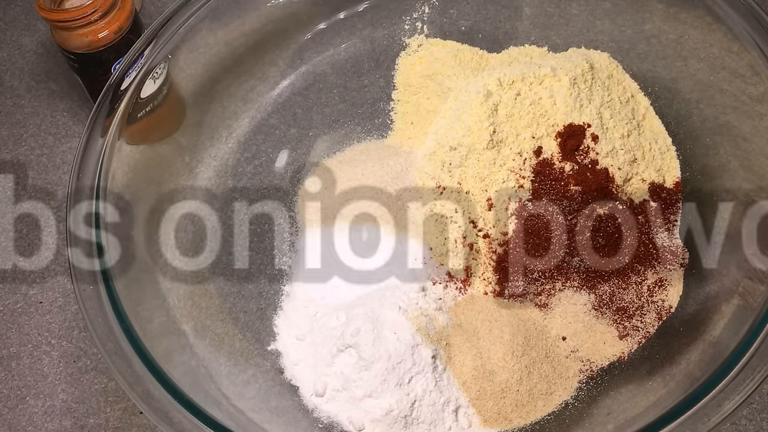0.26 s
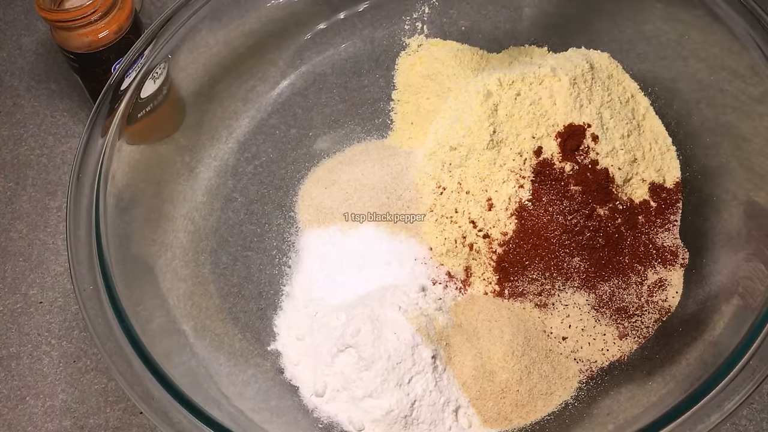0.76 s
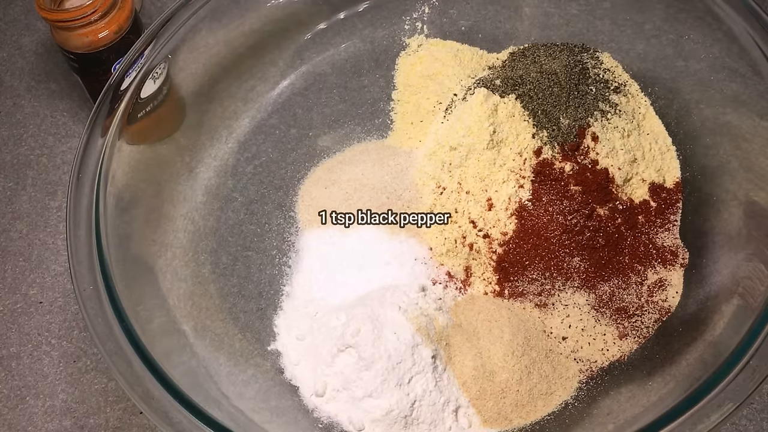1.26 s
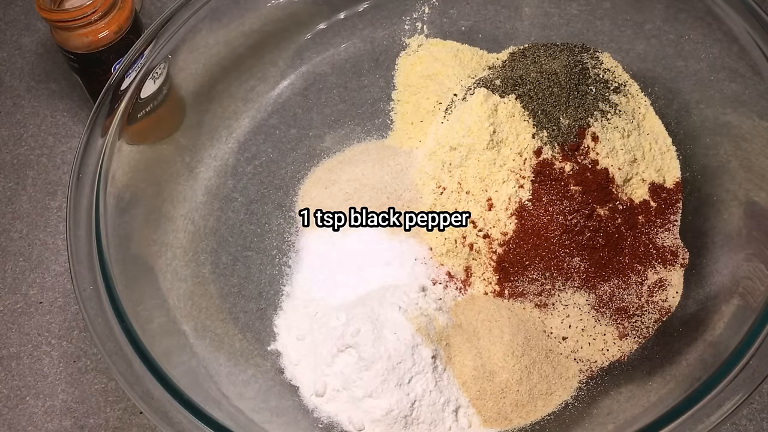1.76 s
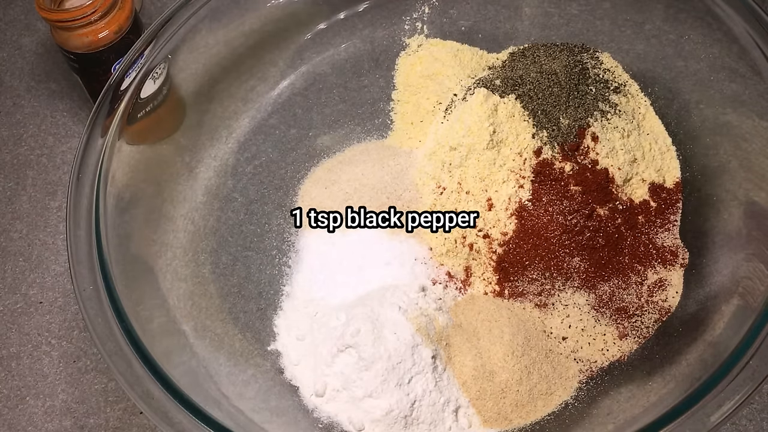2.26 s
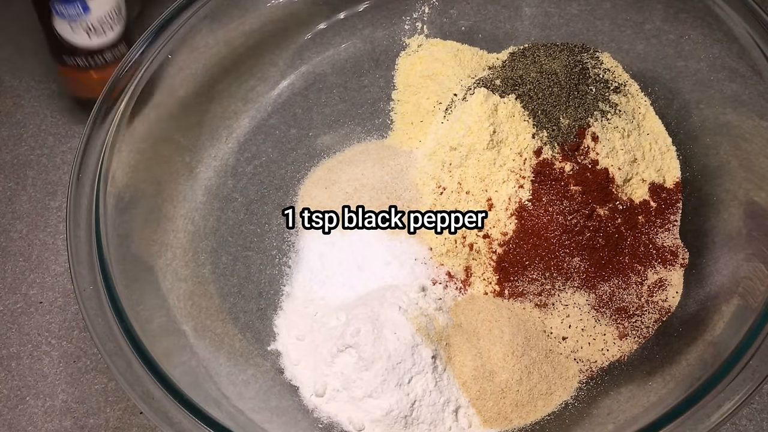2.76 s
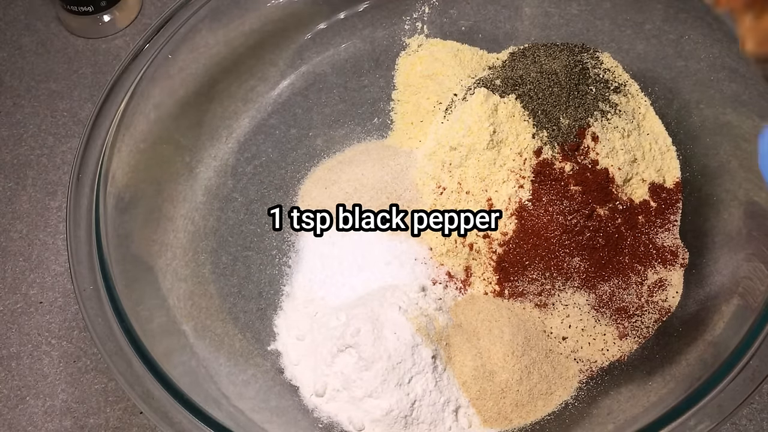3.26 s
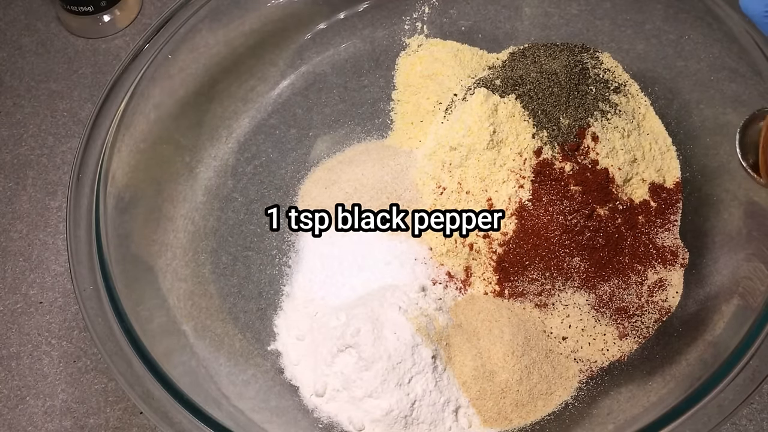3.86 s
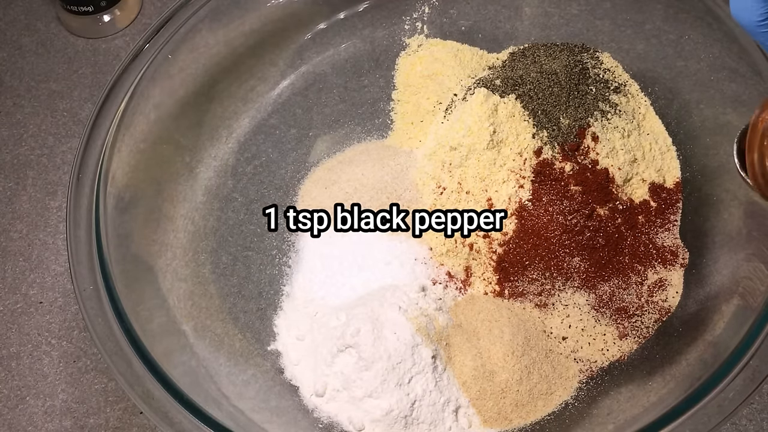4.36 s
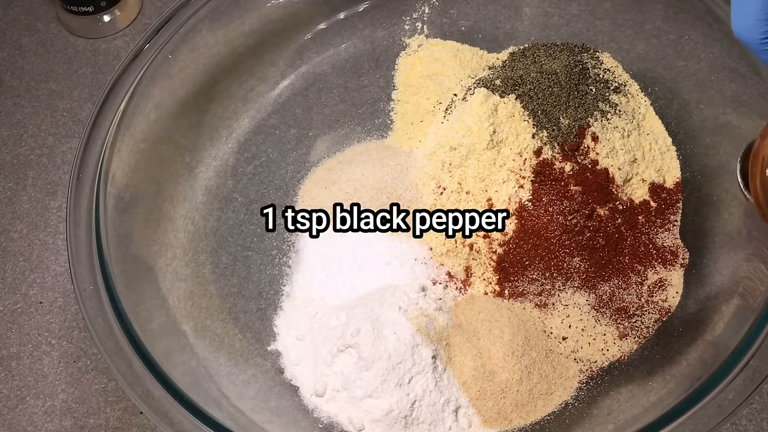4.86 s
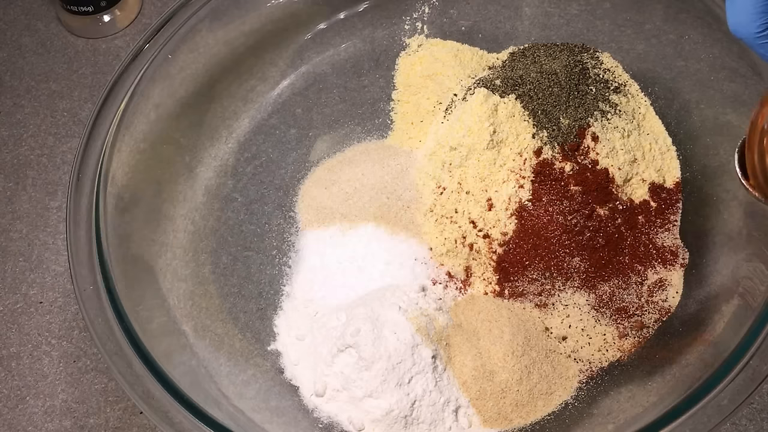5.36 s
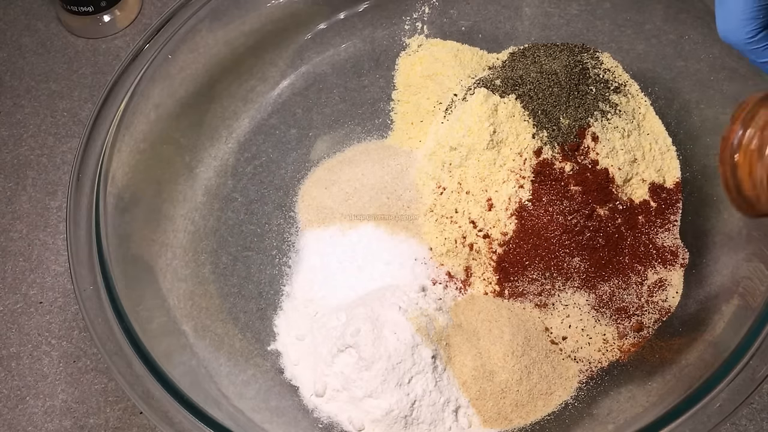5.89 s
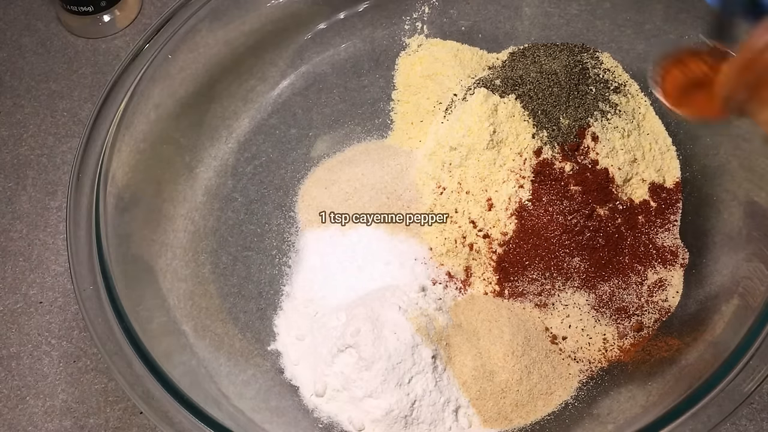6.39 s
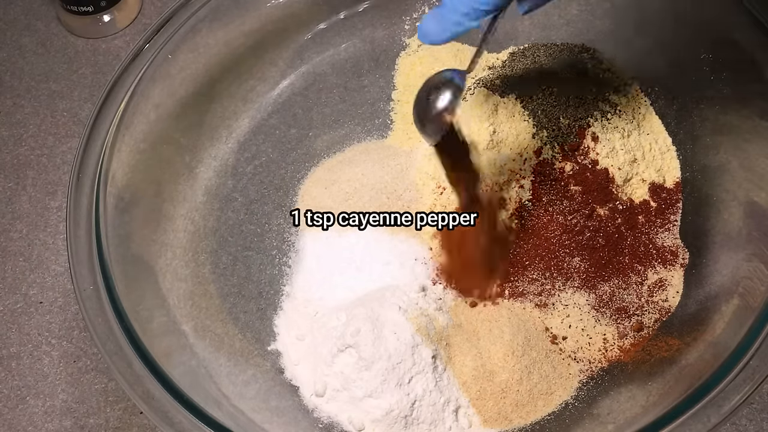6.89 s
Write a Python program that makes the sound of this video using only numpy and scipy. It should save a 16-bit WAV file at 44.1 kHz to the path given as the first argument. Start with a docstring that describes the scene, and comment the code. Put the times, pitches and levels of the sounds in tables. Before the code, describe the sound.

Close-miked spice measuring in a lightly reverberant kitchen, with a wavering low hum throughout. First a sharp, damped glass knock, then rasping lid twists, little plastic snaps and a firm hollow press. A jar is put down on the counter, there is faint brushing, and finally sparse dry spoon ticks grow louder and more frequent as powder is scooped.

```python
"""Measuring spices in a kitchen

Spices are measured into a glass bowl over the hum of an appliance: wavering tones and filtered noise.
A spoon knocks on the bowl, a lid is screwed and pressed onto a jar, and the jar is set down;
then the spoon scoops in the next jar, ticking and dragging on its neck as it is shaken level.
Knocks are clicks, short cracks and ringing tones; rubbing is a dense train of tiny slips."""
import sys
import numpy as np
from scipy import signal
from scipy.fft import rfft, irfft
from scipy.io import wavfile
from scipy.ndimage import uniform_filter1d

SR = 44100
rng = np.random.default_rng(int(sys.argv[2]) if len(sys.argv) > 2 else 0)


def put_to_file(sound):
    """Save the sound as 16-bit audio at rate SR, in the file named by the first command-line argument."""
    columns = np.atleast_2d(sound).T  # one column per channel
    safe = np.clip(columns, -1, 1)
    whole_steps = np.round(safe * 32767)
    wavfile.write(sys.argv[1], SR, whole_steps.astype(np.int16))


N = 314433

# spoon ticking on the neck of the jar: start_s, level_db, brightness (dB per octave)
TICKS = [(4.509, -47.5, -4), (4.7901, -43, -1.5), (4.906, -57, -0.5), (5.216, -53, -2.5),
         (5.2373, -47, -4.5), (5.3124, -37.5, 0), (5.5298, -41.5, -2.5), (5.6298, -41.5, 3),
         (6.273, -35.5, 0), (6.4212, -35, 1.5), (6.5191, -43, 1), (6.59, -35, 2), (6.6777, -34.5, 2.5),
         (6.8604, -39.5, 3.5)]
# spoon meeting the jar's inner wall: start_s, level_db, brightness (dB per octave)
INNER_TAPS = [(5.8103, -33, -0.5), (6.0064, -45, -0.5)]
# tone colour of spoon against jar: pitch_hz, level_db
SPOON_COLOUR = [(200, -5.5), (700, 1.5), (1800, 6), (3000, 3.5), (4500, -3.5), (6200, -4), (7500, -15.5),
                (9000, -17), (11000, -22), (16000, -27)]
# tone colour of the lid's rubbing and of the plastic snaps: pitch_hz, level_db
LID_COLOUR = [(400, -36), (1400, -8), (2100, -8.5), (2800, 4), (3700, 6), (4400, 2), (5100, 1), (6200, 4.5),
              (7700, -7), (8800, -4.5), (9600, -1.5), (10600, -11.5), (13000, -12), (15200, -13)]


def gain_of(db):
    """Turns decibels into a factor."""
    return 10 ** (np.asarray(db) / 20)


def evened(x):
    """Scales to an rms (average strength) of 1."""
    return x / np.sqrt(np.mean(x ** 2) + 1e-20)


def read(points, hz):
    """Reads a table between its points, on a log-frequency axis."""
    point_hz, value = np.transpose(points)
    return np.interp(np.log(hz + 1), np.log(point_hz + 1), value)


def add(mix, start_s, sound):
    """Mixes a sound in at a given time."""
    part = mix[round(start_s * SR):][:len(sound)]
    part += sound[:len(part)]


def tilt(hz, slope_db):
    """Spectral slope in dB per octave around 2 kHz: hard contacts are bright, soft ones dull."""
    return gain_of(slope_db * np.log2(np.maximum(hz, 200) / 2000))


def colour(x, shape, slope_db=0):
    """Filters a sound by a colour table and a slope, to rms 1."""
    hz = np.fft.rfftfreq(len(x), 1 / SR)
    gain = gain_of(read(shape, hz)) * tilt(hz, slope_db)
    return evened(irfft(rfft(x) * gain, len(x)))


def drift(rate):
    """Slow chance of rms 1, moving up to about rate times a second."""
    hz = np.fft.rfftfreq(N, 1 / SR)
    spectrum = rfft(rng.standard_normal(N))
    return evened(irfft(spectrum * np.exp(-(hz / rate) ** 2), N))


def click(shape, slope_db):
    """One sharp push with a tilted spectrum and nothing before it; energy 1."""
    hz = np.fft.rfftfreq(SR // 4, 1 / SR)
    gain = gain_of(read(shape, hz)) * tilt(hz, slope_db)
    log_gain = np.log(np.concatenate([gain, gain[:0:-1]]))
    # minimum phase: all the energy comes as early as this spectrum allows
    push = np.fft.ifft(np.exp(np.conj(signal.hilbert(log_gain)))).real
    return push / np.linalg.norm(push)


def strikes(rows, modes, crack_shape, crack_db, crack_t60, click_db):
    """Each blow is a contact click, a crack of quickly dying noise, and the object's main modes."""
    out, t = np.zeros(N), np.arange(SR // 4) / SR
    for start_s, level_db, slope_db in rows:
        push = click(crack_shape, slope_db)[:len(t)]
        dying_noise = rng.standard_normal(len(t)) * gain_of(-60 * t / crack_t60)
        crack = signal.fftconvolve(dying_noise, push)[:len(t)]
        blow = gain_of(crack_db) * evened(crack) + gain_of(click_db) * evened(push)
        if modes:
            ring = np.zeros(len(t))
            for k, (hz, mode_db, t60) in enumerate(modes):
                strength = gain_of(mode_db - 60 * t / t60) * tilt(hz, slope_db)
                # neighbouring modes move in opposite directions, so the ring takes a moment to build
                ring += (-1) ** k * strength * np.sin(2 * np.pi * hz * t)
            blow += evened(ring * (1 - np.exp(-t / 0.00047)))  # the contact lasts a fraction of a ms
        first_10_ms = blow[:SR // 100]
        add(out, start_s, gain_of(level_db) * blow / np.std(first_10_ms))
    return out


def rubs(rows, shape, grain_db, slips_per_s, rise_s, fade_s, uneven_db):
    """Friction: a dense train of slips sounds the surface, under a pressure that keeps changing."""
    out, t = np.zeros(N), np.arange(2 * SR) / SR
    for start_s, length_s, level_db, slope_db in rows:
        size = gain_of(grain_db * np.minimum(rng.exponential(1, len(t)), 4))
        happens = rng.random(len(t)) < slips_per_s / SR
        slips = size * rng.choice([-1, 1], len(t)) * happens
        # the stroke rises, holds until length_s, then fades
        stroke = np.minimum(t / rise_s, 1) * np.exp(-np.maximum(t - length_s, 0) / fade_s)
        add(out, start_s, gain_of(level_db) * stroke * colour(slips, shape, slope_db))
    return out * gain_of(uneven_db * drift(67))


def shifting(x):
    """As the point of contact travels, different resonances come and go."""
    z = signal.stft(x, SR, nperseg=256)[2]
    across_pitch = uniform_filter1d(rng.standard_normal(z.shape), size=4, axis=0)
    patches = evened(uniform_filter1d(across_pitch, size=8, axis=1))
    return signal.istft(z * evened(gain_of(2.8 * patches)), SR, nperseg=256)[1][:N]


def at_microphones(x, lag_s):
    """Two close microphones hear the same sound, the left one lag_s later."""
    hz = np.fft.rfftfreq(N, 1 / SR)
    left = irfft(rfft(x) * np.exp(-2j * np.pi * hz * lag_s), N)
    return np.array([left, x])


def tone(hz, wander_hz, rate, flutter_db):
    """A hum whose pitch and strength waver."""
    turns = np.cumsum(hz + wander_hz * drift(rate)) / SR
    return np.sqrt(2) * np.sin(2 * np.pi * turns) * gain_of(flutter_db * drift(rate))


def appliance():
    """Two wavering low tones and a faint higher one over a rumble of moving air."""
    # pitch_hz, level_db, pitch wander (Hz), changes per second, flutter (dB)
    hum_tones = [(57.5, -49.5, 2.84, 5.4, 2.5), (188, -48, 4.7, 9.95, 0.67),
                 (459, -66.5, 11.06, 20.5, -0.4)]
    # the middle tone swells for a while: time_s, level_db
    hum_swell = [(0, -2), (2.9, -1.5), (3.6, 3), (4.1, 0.5), (4.6, -0.5), (7.13, -1.5)]
    # colour of the rumble: pitch_hz, level_db
    air_colour = [(20, -28), (30, -1), (45, -6), (70, -0.5), (85, 0.5), (115, 1.5), (165, 0.5), (200, -0.5),
                  (240, -9), (400, -13.5), (600, -19), (900, -36), (2000, -32), (15000, -63)]
    lower, upper, whine = [gain_of(level_db) * tone(hz, wander_hz, rate, flutter_db)
                           for hz, level_db, wander_hz, rate, flutter_db in hum_tones]
    swell = gain_of(np.interp(np.arange(N) / SR, *np.transpose(hum_swell)))
    air = gain_of(-49 + 1.0 * drift(0.54)) * colour(rng.standard_normal(N), air_colour)
    return lower + swell * upper + whine + air


def rush():
    """The midrange of the appliance's moving air, as filtered noise."""
    # the rush sinks for a while: time_s, level_db
    rush_level = [(0, -64.5), (1.5, -65), (2.9, -64), (3.15, -71), (4.1, -70), (4.45, -65.5), (5.2, -65),
                  (7.13, -66)]
    # colour of the rush: pitch_hz, level_db
    rush_colour = [(300, -18), (700, 1), (890, 6), (1150, -2), (1400, -2.5), (2000, -11.5), (4000, -17.5),
                   (9000, -23), (15000, -76)]
    time_s, level_db = np.transpose(rush_level)
    level = gain_of(np.interp(np.arange(N) / SR, time_s, level_db))
    return level * colour(rng.standard_normal(N), rush_colour)


def microphone_hiss():
    """Each microphone adds its own faint noise."""
    # colour of the hiss: pitch_hz, level_db
    hiss_colour = [(100, -32), (12500, -6), (15500, -17)]
    noises = rng.standard_normal((2, N))
    return gain_of(-79) * np.array([colour(noise, hiss_colour) for noise in noises])


def jar_slides():
    """Jars slide on the counter in short, dull rubs."""
    # start_s, length_s, level_db, brightness (dB per octave)
    slide_times = [(0.569, 0.026, -42, -4), (0.606, 0.044, -63, 1), (2.484, 0.013, -38, -2),
                   (2.498, 0.02, -43, 3.5), (2.947, 0.035, -44, 0), (2.985, 0.031, -43, -9)]
    # colour of the sliding: pitch_hz, level_db
    slide_colour = [(150, -1), (500, 2.5), (900, 4), (1300, 0.5), (1800, -1), (2600, -12.5), (5000, -35),
                    (16000, -31)]
    return rubs(slide_times, slide_colour, grain_db=5.5, slips_per_s=9300,
                rise_s=0.0022, fade_s=0.0042, uneven_db=1.5)


def squeaks(width_hz):
    """A rubbed lid, jar or spoon sticks: irregular slips feed one narrow resonance."""
    # start_s, length_s, level_db, pitch_hz
    squeak_times = [(0.572, 0.057, -54, 1650), (1.595, 0.13, -64, 4430), (2.005, 0.016, -46.5, 5900),
                    (2.11, 0.025, -42, 4370), (2.109, 0.025, -47, 9400), (2.207, 0.056, -60, 9300),
                    (3.503, 0.046, -55.5, 3730), (4.181, 0.023, -64, 3630), (6.043, 0.029, -60, 3580),
                    (6.064, 0.036, -55, 1970), (6.807, 0.02, -56, 3650)]
    out = np.zeros(N)
    for start_s, length_s, level_db, hz in squeak_times:
        t = np.arange(round(length_s * SR)) / SR
        ring = np.exp(-np.pi * width_hz * t) * np.sin(2 * np.pi * hz * t)
        squeal = signal.fftconvolve(rng.standard_normal(len(t)), ring)[:len(t)]
        swelling = signal.windows.tukey(len(t), .5)  # rises and fades
        add(out, start_s, gain_of(level_db) * evened(squeal * swelling))
    return out


def bowl_knocks():
    """The spoon strikes the glass bowl, whose ring is damped by the powder in it."""
    # start_s, level_db, brightness (dB per octave)
    bowl_hits = [(0.5727, -54, -3), (0.9461, -21.5, 0), (0.9487, -30, 4)]
    # ringing modes of the bowl: pitch_hz, level_db, time to fall 60 dB (s)
    bowl_modes = [(469, -4.5, 0.057), (527, -14, 0.051), (635, -2.5, 0.14), (795, -15, .06),
                  (872, 13.5, 0.037), (1070, -9, 0.12), (1246, 3.5, 0.09), (1363, 5, 0.12),
                  (1570, -21, 0.09), (1655, 4, 0.088), (2340, -18, 0.15), (2715, -12, 0.11),
                  (3000, -9, 0.051), (3270, -19, 0.044), (4300, -11, 0.073), (6560, -14, 0.045)]
    # colour of click and crack: pitch_hz, level_db
    bowl_colour = [(200, -20), (500, 4), (1500, 3), (2100, -9.5), (3300, -7.5), (6500, -13.5), (9500, -16),
                   (11000, -24), (16000, -20)]
    return strikes(bowl_hits, bowl_modes, bowl_colour, crack_db=-3.5, crack_t60=0.091, click_db=-16.5)


def plastic_snaps():
    """Thin plastic snaps: click and crack only, with no ringing modes."""
    # start_s, level_db, brightness (dB per octave)
    snap_times = [(0.665, -57, 12), (0.7159, -46, 14.5), (0.7653, -60, 7.5), (2.1404, -36, -3),
                  (2.248, -48.5, -12.5), (2.309, -46, 5), (2.553, -40.5, 16), (2.6315, -57, 7),
                  (3.1668, -46.5, 1.5)]
    return strikes(snap_times, [], LID_COLOUR, crack_db=24.5, crack_t60=0.019, click_db=16)


def brushing():
    """Gloved fingers brush softly and powder trickles: a fine, bright grain."""
    # start_s, length_s, level_db, brightness (dB per octave)
    brush_times = [(1.1, 0.256, -72, -3), (3.345, 0.046, -59, -4.5), (3.58, 0.44, -72, -2),
                   (3.88, 0.3, -68.5, 3.5), (3.94, 0.028, -62, 4)]
    # colour of the brushing: pitch_hz, level_db
    brush_colour = [(1000, -10), (3000, 1.5), (6500, 1.5), (10000, -1), (15500, -4)]
    return rubs(brush_times, brush_colour, grain_db=3, slips_per_s=4800,
                rise_s=0.0073, fade_s=0.023, uneven_db=2.5)


def lid_turning():
    """A lid grates on its thread at each twist and whispers as it spins loosely between them."""
    # twists on the thread: start_s, length_s, level_db, brightness (dB per octave)
    twist_times = [(1.652, 0.039, -52, -2.5), (1.738, 0.063, -47.5, 2.5), (1.965, 0.073, -56.5, 4.5),
                   (2.096, 0.011, -38, 4), (2.103, 0.026, -36.5, -2), (2.14, 0.046, -47, -7),
                   (2.203, 0.026, -49.5, 0), (2.28, 0.024, -48, -6), (2.446, 0.033, -48.5, -3.5),
                   (2.62, 0.015, -53, -6), (3.067, 0.026, -57.5, -5.5), (3.507, 0.028, -53, -3),
                   (4.022, 0.021, -52, 7)]
    # loose spinning: start_s, length_s, level_db, brightness (dB per octave)
    spin_times = [(1.6, 0.098, -62.5, -5), (1.8, 0.256, -64, 8.5), (2.1, 0.456, -62.5, -0.5)]
    twists = rubs(twist_times, LID_COLOUR, grain_db=1.5, slips_per_s=5400,
                  rise_s=0.013, fade_s=0.013, uneven_db=2.7)
    spin = rubs(spin_times, LID_COLOUR, grain_db=2.5, slips_per_s=5000,
                rise_s=0.0077, fade_s=0.048, uneven_db=4.6)
    return twists + spin


def lid_knocks():
    """The lid closes on the jar with hollow knocks that ring the jar."""
    # start_s, level_db, brightness (dB per octave)
    knock_times = [(2.3053, -29.5, -6.5), (2.5305, -28, 4), (2.5352, -18.5, 1)]
    # ringing modes of the jar: pitch_hz, level_db, time to fall 60 dB (s)
    jar_modes = [(278, -10.5, 0.059), (466, 4, 0.03), (604, 3.5, 0.055), (840, -6.5, 0.043),
                 (890, -4, 0.056), (1106, -10, 0.059), (1337, -20, 0.052), (1570, -34, .04)]
    # colour of click and crack: pitch_hz, level_db
    jar_colour = [(100, -6), (350, 3), (700, 9.5), (1300, 6), (2000, -15), (3000, -20), (4500, -41),
                  (16000, -49)]
    return strikes(knock_times, jar_modes, jar_colour, crack_db=-5.5, crack_t60=0.031, click_db=-10)


def counter_bumps():
    """Jars bump on the counter, which answers with low modes and a strong crack."""
    # start_s, level_db, brightness (dB per octave)
    bump_times = [(2.9219, -28, 5.5), (2.9354, -26, 3), (2.9412, -32.5, 4), (3.4252, -41, 0.5),
                  (3.438, -44.5, 3.5)]
    # ringing modes of the counter: pitch_hz, level_db, time to fall 60 dB (s)
    counter_modes = [(152, 1, 0.097), (221, 10.5, 0.052), (434, 1, 0.1), (512, -2, 0.11), (656, -24, 0.08),
                     (682, -0.5, 0.067), (970, -11.5, 0.051), (1180, 0.5, 0.017), (1460, -17.5, 0.063),
                     (2000, -12, 0.029), (3110, -52, 0.13)]
    # colour of click and crack: pitch_hz, level_db
    counter_colour = [(100, 24), (600, 13), (1500, 3.5), (2400, -7.5), (4200, -15.5), (7000, -27),
                      (10000, -37), (16000, -41)]
    return strikes(bump_times, counter_modes, counter_colour,
                   crack_db=-0.5, crack_t60=.035, click_db=-15)


def scooping():
    """The spoon scrapes through powder and drags on along the glass after each tick or tap."""
    # scrapes: start_s, length_s, level_db, brightness (dB per octave)
    scoop_times = [(4.18, 0.012, -63, 6), (4.4, 0.012, -63, 5.5), (4.5, 0.013, -54.5, -3),
                   (5.162, 0.01, -61.5, 6.5), (5.425, 0.026, -56.5, -1.5), (5.733, 0.016, -58.5, -1.5),
                   (5.895, .04, -58.5, -7.5), (6.073, 0.024, -56.5, -3), (6.178, 0.034, -58.5, 0.5),
                   (6.349, 0.016, -55, -2), (6.76, 0.045, -61, -1.5), (6.92, 0.05, -59.5, -6)]
    delay_s, length_s = 0.008, 0.017
    softer_db, duller_db = -24, -4.5  # each drag compared with its tick
    drags = [(start_s + delay_s, length_s, level_db + softer_db, slope_db + duller_db)
             for start_s, level_db, slope_db in TICKS + INNER_TAPS]
    return rubs(scoop_times + drags, SPOON_COLOUR, grain_db=0.5, slips_per_s=1800,
                rise_s=0.0016, fade_s=0.01, uneven_db=4.5)


def spoon_ticks():
    """The spoon ticks on the neck of the jar: mostly short, high modes."""
    # ringing modes: pitch_hz, level_db, time to fall 60 dB (s)
    tick_modes = [(652, -12, 0.064), (1012, 5, 0.033), (1170, -6.5, 0.016), (1543, -5.5, 0.034),
                  (2127, -21, 0.19), (2310, 6, 0.01), (2852, 1, 0.022), (3086, -21, 0.13),
                  (3550, -31, 0.016), (3690, 6, 0.0098), (4870, -16, 0.0052), (6170, -11, 0.0086),
                  (5600, -2.5, 0.0067), (6820, -3, 0.006), (8820, -15, 0.023)]
    return strikes(TICKS, tick_modes, SPOON_COLOUR, crack_db=-5, crack_t60=0.029, click_db=-8)


def wall_taps():
    """The spoon meets the inner wall of the jar, ringing another set of modes."""
    # ringing modes: pitch_hz, level_db, time to fall 60 dB (s)
    wall_modes = [(1025, -5.5, 0.026), (1300, -2.5, 0.025), (1520, 5.5, 0.014), (1683, -9, 0.049),
                  (1910, -7.5, 0.06), (2670, 2.5, 0.012), (3670, -7, 0.014), (4800, -7, 0.015),
                  (12800, -17, .015)]
    return strikes(INNER_TAPS, wall_modes, SPOON_COLOUR, crack_db=-5.5, crack_t60=0.028, click_db=-17)


def kitchen(x):
    """The room's tail: sparse reflections of random sign, each pitch band dying at its own pace."""
    # pitch_hz, time to fall 60 dB (s)
    room_decay = [(100, 0.15), (600, 0.24), (2000, 0.24), (6000, 0.23), (15000, 0.34)]
    t = np.arange(SR // 2) / SR
    arrives = (rng.random(len(t)) < 4000 / SR) * (t > .008)  # 4000 a second, after 8 ms
    taps = rng.choice([-1., 1.], len(t)) * arrives
    hz, frame_s, z = signal.stft(taps, SR, nperseg=128)
    decay = gain_of(-60 * frame_s / read(room_decay, hz)[:, None])
    tail = signal.istft(z * decay, SR, nperseg=128)[1]
    return signal.fftconvolve(x, tail / np.linalg.norm(tail))[:N]


def scene():
    """All the handling happens close to a narrow pair of microphones, a little to the right."""
    background = at_microphones(appliance() + rush(), 1e-5) + microphone_hiss()
    knocks = bowl_knocks() + lid_knocks() + counter_bumps()
    rubbing = shifting(lid_turning() + scooping()) + jar_slides() + brushing() + squeaks(width_hz=210)
    small = spoon_ticks() + wall_taps() + plastic_snaps() + rubbing
    to_room = gain_of(-16) * knocks + gain_of(-21) * small
    # the room answers from both sides
    echoes = at_microphones(kitchen(to_room), 3e-5) + at_microphones(kitchen(to_room), -3.3e-5)
    return at_microphones(knocks + small, 2.4e-5) + echoes + background


def record(dry):
    """The recorder's band limit: a low-pass filter."""
    low_pass = signal.firwin(401, 15900, window=("kaiser", 9), fs=SR)  # edge in Hz
    return signal.oaconvolve(dry, low_pass[None], "same")


dry = scene()
out = record(dry)
put_to_file(out)
```